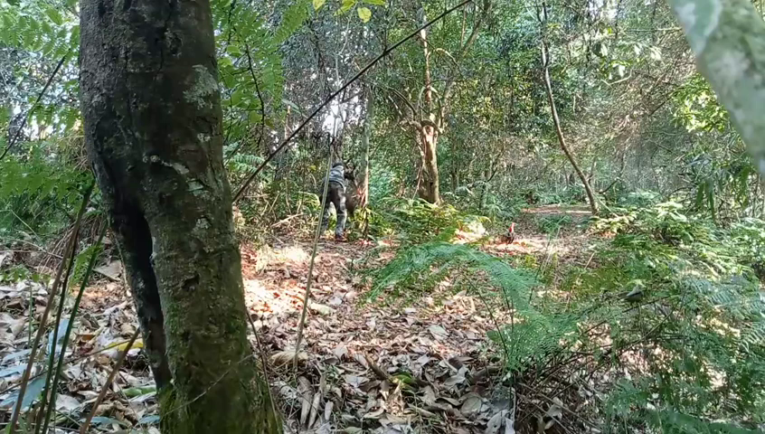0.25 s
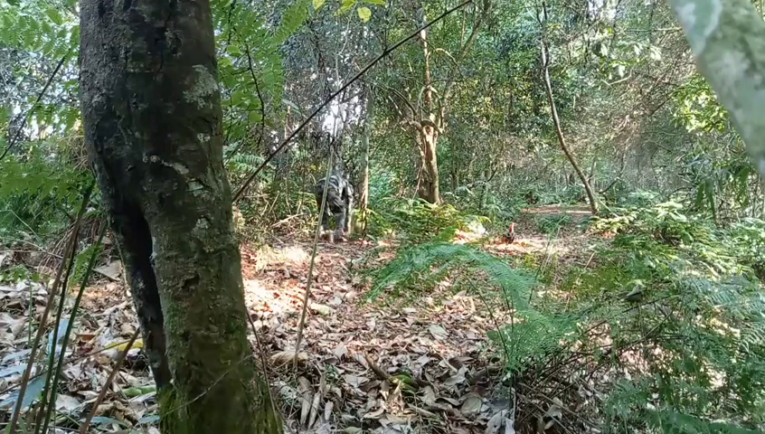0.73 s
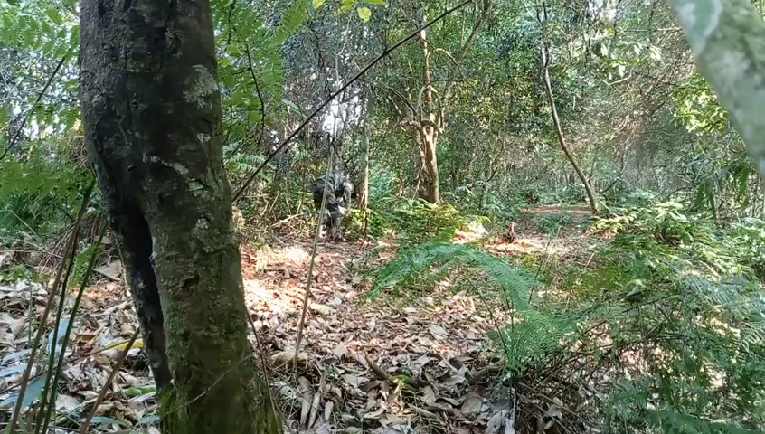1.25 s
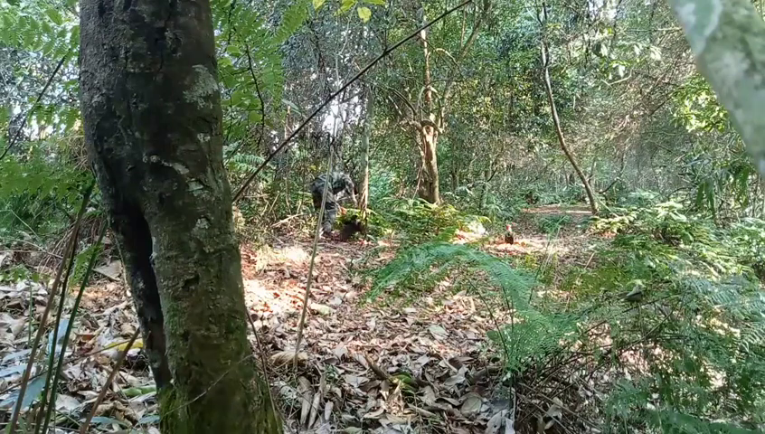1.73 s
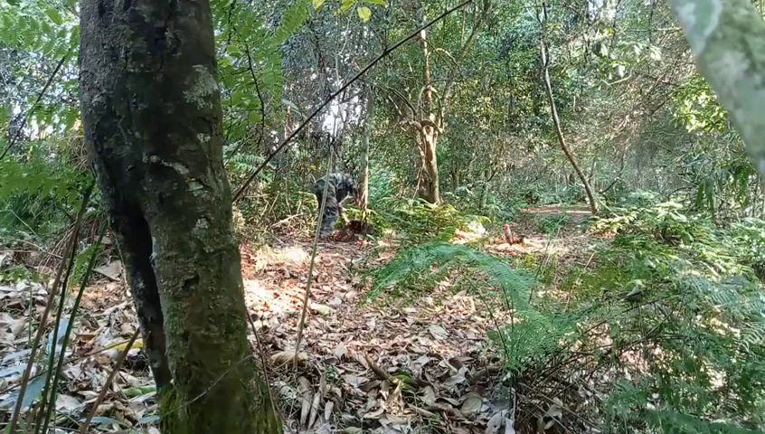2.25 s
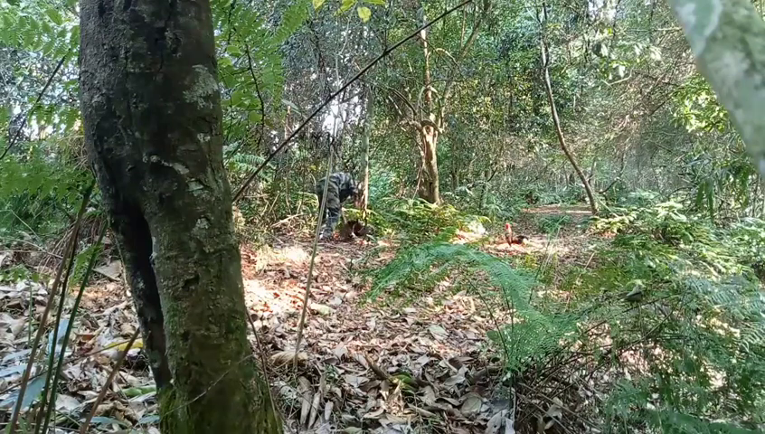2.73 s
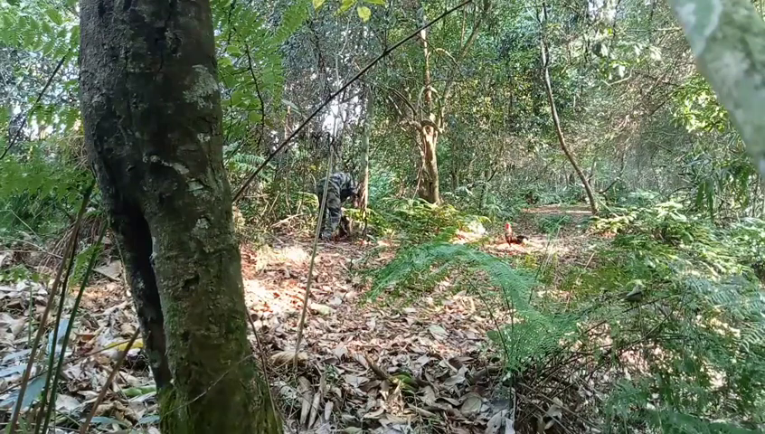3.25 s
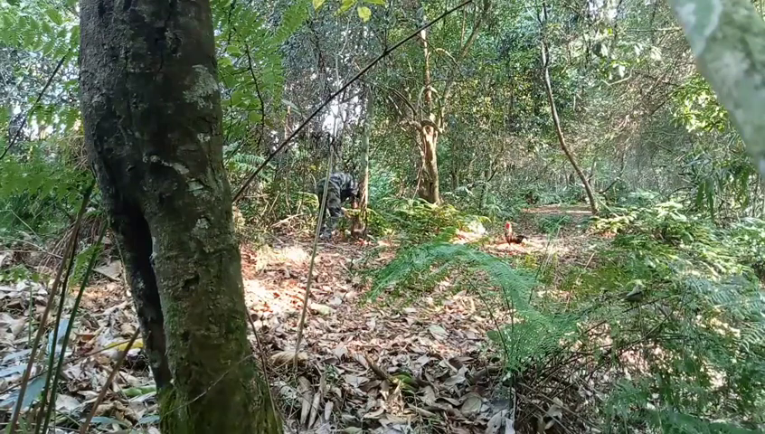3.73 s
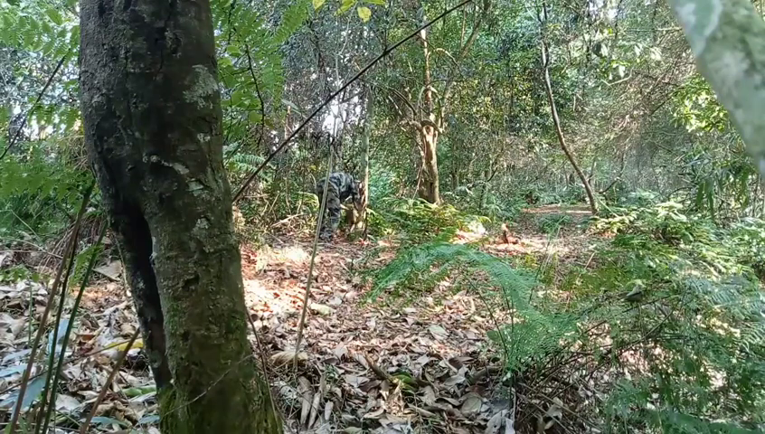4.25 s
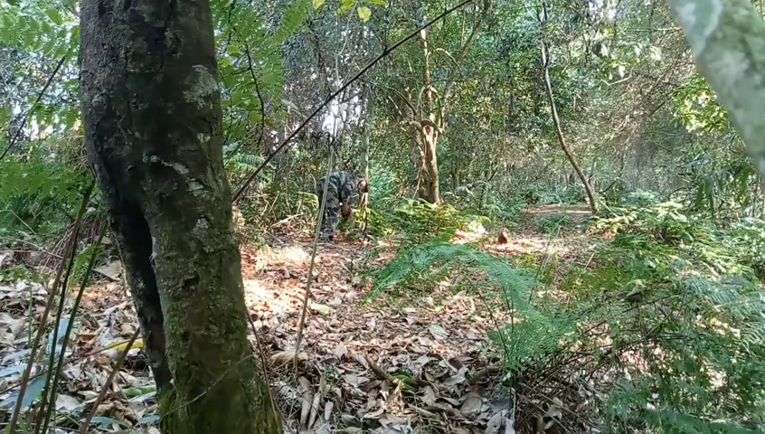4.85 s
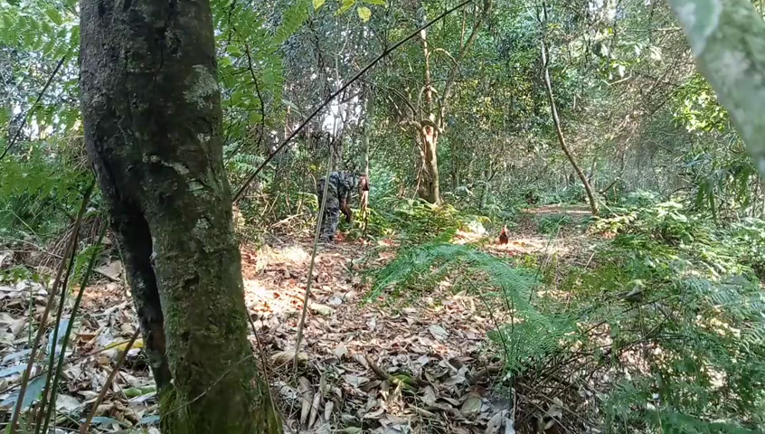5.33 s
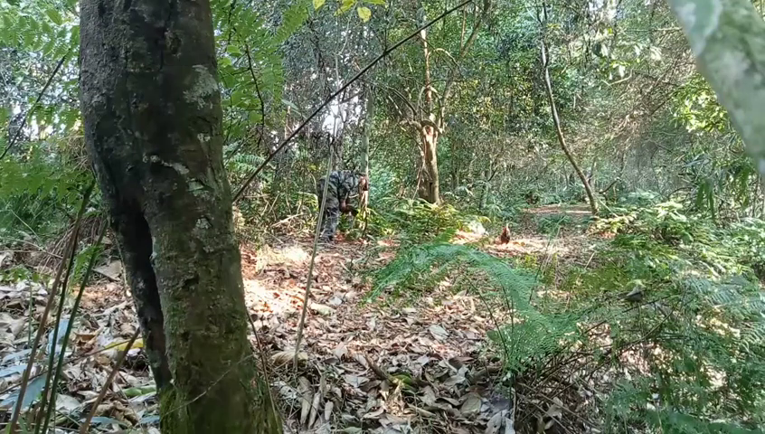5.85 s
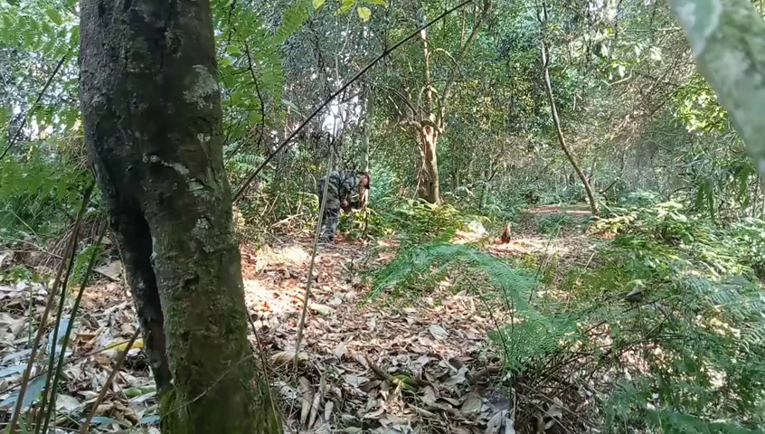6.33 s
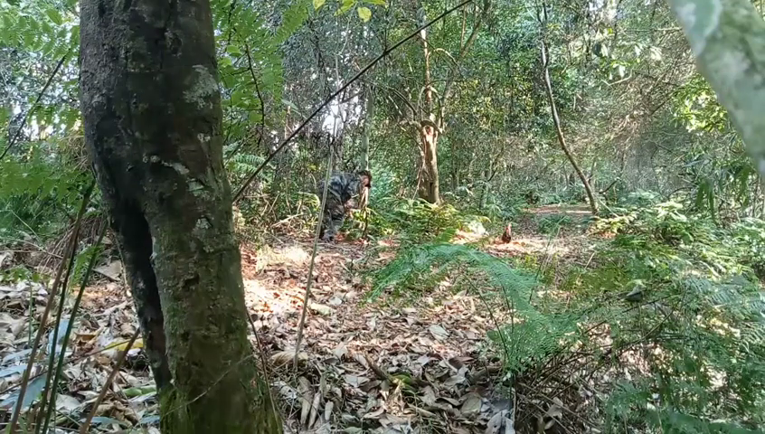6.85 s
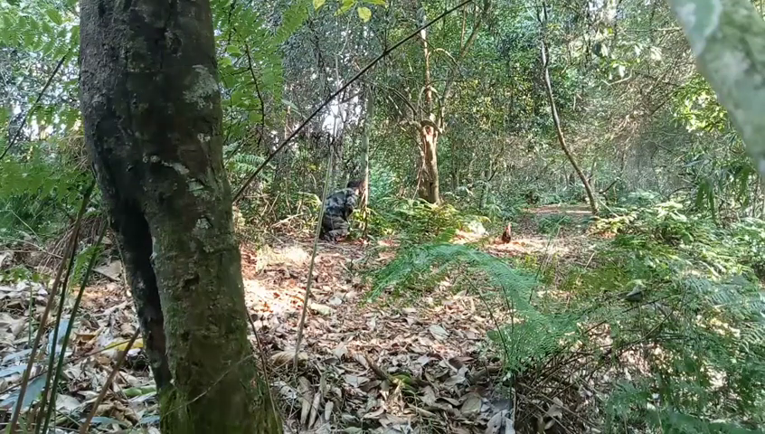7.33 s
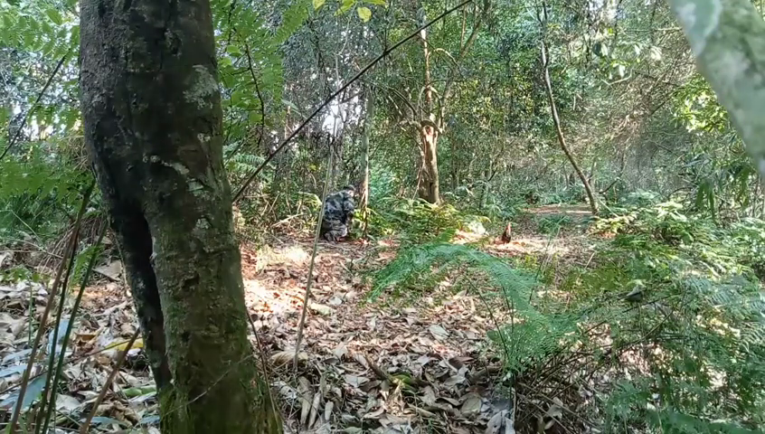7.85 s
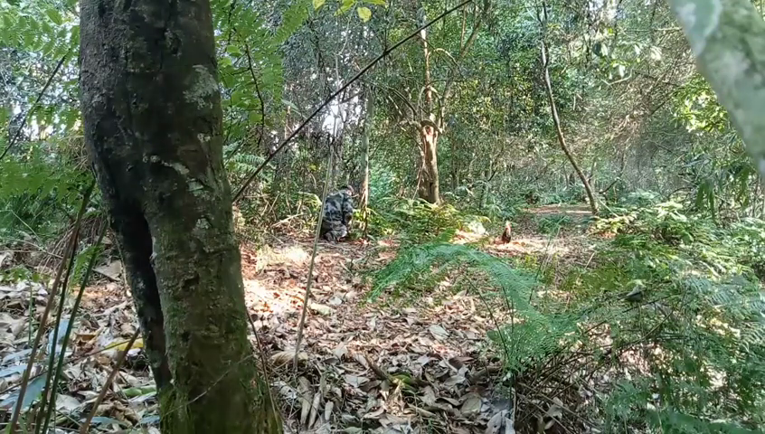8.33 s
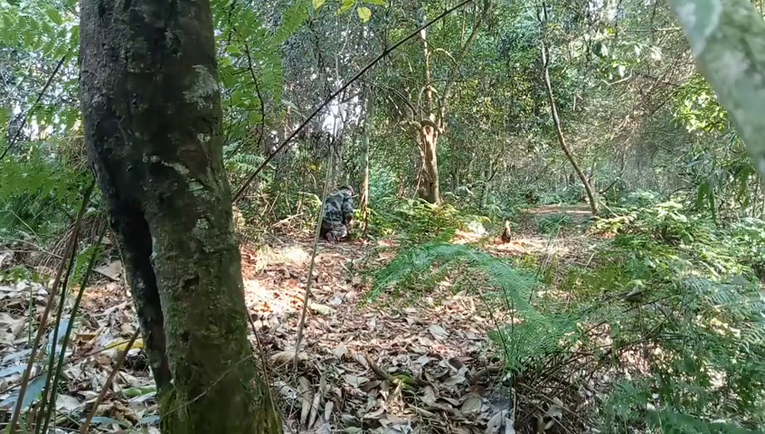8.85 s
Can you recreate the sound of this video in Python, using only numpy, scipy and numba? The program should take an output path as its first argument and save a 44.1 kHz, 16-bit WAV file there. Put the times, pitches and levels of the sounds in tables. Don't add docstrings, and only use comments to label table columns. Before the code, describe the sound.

Two chickens are heard some way off in a wood. From 0 to 1.4 s a hen gives eight short, throaty clucks, evenly spaced, while dry leaves rustle and snap under feet and a second fowl adds small high peeps and low pips. A hoarse cry grows from 1.3 s into the hen's loud, nasal squawk at 1.5 s. From 2.1 to 3.6 s the clucks are much softer, as if turned away. Leaves shuffle again around 3.7-4.2 s, clucks brighten, and a higher squawk comes at 4.4 s. Rasping cries swell at 4.9 and 5.3 s, then another squawk at 5.5 s. Clucks resume at 6.0 s beneath a long growing rasp, with a steady squawk at 7.0 s. After a lull, a faint cry and clucks from 7.8 s lead to the lowest, roughest squawk at 8.5 s and a last soft cluck near 9 s. Short diffuse echoes and faint hush surround the calls.

```python
import sys
import numpy as np
from scipy import signal
from scipy.fft import rfft, irfft
from scipy.io import wavfile
from scipy.ndimage import uniform_filter1d
from numba import njit

SR = 44100
rng = np.random.default_rng(int(sys.argv[2]) if len(sys.argv) > 2 else 0)


def wav_out(sig):
    wavfile.write(sys.argv[1], SR, np.round(np.clip(np.atleast_2d(sig).T, -1, 1) * 32767).astype(np.int16))


def how_loud(loudness_db):
    steps = np.asarray(loudness_db, float) / 20
    return 10 ** steps


N = 401310
T = np.arange(N) / SR


def level(x, db):
    return x * how_loud(db) / np.sqrt(np.mean(x ** 2) + 1e-30)


def colour(x, points, size=1024):
    hz, db = np.transpose(points)
    bins_hz = np.arange(size // 2 + 1) * SR / size
    log_gain = np.interp(np.log(bins_hz + 1), np.log(hz), db) * np.log(10) / 20
    cepstrum = irfft(log_gain)
    cepstrum[1:size // 2] *= 2
    cepstrum[size // 2 + 1:] = 0
    response = irfft(np.exp(rfft(cepstrum)))
    return signal.oaconvolve(x, response)[:len(x)]


def brighter(x, db, hz):
    treble = signal.sosfilt(signal.butter(2, hz, "high", fs=SR, output="sos"), x)
    return x + (how_loud(db) - 1) * treble


def walk(rate_hz, size):
    k = max(int(SR / rate_hz), 1)
    return level(uniform_filter1d(uniform_filter1d(rng.standard_normal(size), k), k), 0)


@njit
def sweep(x, hz, width):
    y, band, low = np.empty(len(x)), 0., 0.
    for i in range(len(x)):
        g, k = np.tan(np.pi * hz[i] / SR), width / hz[i]
        v = (band + g * (x[i] - low)) / (1 + g * (g + k))
        band, low, y[i] = 2 * v - band, low + 2 * g * v, k * v
    return y


def span(table, fade_s):
    s, *columns = np.transpose(table)
    at = slice(int(s[0] * SR), min(int(s[-1] * SR), N))
    t = T[at]
    ends = np.clip(np.minimum(t - s[0], s[-1] - t) / fade_s, 0, 1)
    return at, t, [np.interp(t, s, c) for c in columns], ends


def pulses(hz, patchy_db, overtones_db):
    phase = 2 * np.pi * np.cumsum(hz) / SR
    count = int(SR / 2.6 / np.mean(hz))
    knots = np.linspace(0, len(hz), len(hz) // 1500 + 2)
    shape_db = np.asarray(overtones_db)[np.minimum(np.arange(count), len(overtones_db) - 1), None]
    gains = how_loud(shape_db + patchy_db * rng.standard_normal((count, len(knots))))
    samples = np.arange(len(hz))
    train = sum(np.interp(samples, knots, g) * np.cos(k * phase) for k, g in enumerate(gains, 1))
    return level(train, 0), phase


def syrinx(hz, hoarse, alternate, overtones_db, wobble, chaos, chaos_hz, flicker, patchy_db):
    hoarse = np.clip(hoarse + flicker * hoarse * (1 - hoarse) * walk(30.7, len(hz)), 0, 1)
    even, phase = pulses(hz * (1 + wobble * walk(120, len(hz))), patchy_db, overtones_db)
    even = even * (1 + alternate * np.cos(phase / 2))
    uneven, phase = pulses(hz * np.exp(chaos * hoarse * walk(chaos_hz, len(hz))), patchy_db, overtones_db)
    uneven = uneven * (1 + alternate * np.cos(phase / 2)) * how_loud(2 * walk(1000, len(hz)))
    air = hoarse ** 3 * .6
    uneven = np.sqrt(1 - air) * uneven + np.sqrt(air) * rng.standard_normal(len(hz))
    return np.sqrt(1 - hoarse) * even + np.sqrt(hoarse) * uneven


LOW_HZ, HIGH_HZ = 2050, 4200


def overtones(shape_db, hz, low_db, high_db):
    at_hz = hz * np.arange(1, len(shape_db) + 1)
    return np.array(shape_db) + low_db * (at_hz < LOW_HZ) + high_db * (at_hz > HIGH_HZ)


# level/dB of overtones 1-6, then of all higher ones
FOWL_OVERTONES_DB = (-5.5, 0, 2.5, -2.5, -1.5, -0.5, -2)
# f/Hz, gain/dB
FOWL_THROAT = [(240, -59.5), (400, -23.5), (701, -32), (867, -5), (1450, -3.5), (2470, -7), (3190, -4.5),
               (5190, -8), (6500, -16.5), (9090, -16.5), (15000, -40)]


def fowl(hz, hoarse, alternate, beak_hz, low_db, high_db):
    shape_db = overtones(FOWL_OVERTONES_DB, hz[0], low_db, high_db)
    source = syrinx(hz, hoarse, alternate, shape_db, wobble=.007, chaos=.17, chaos_hz=514.4,
                    flicker=.5, patchy_db=4.0)
    throat = colour(source, FOWL_THROAT)
    return level(throat + 1.73 * sweep(throat, beak_hz, 670.0), 0)


# t/s, length/s, start f/Hz, end f/Hz, peak level/dB
PEEPS = [
    (0.0, 0.069, 1800, 1680, -43.5),
    (0.523, 0.029, 1800, 1800, -31),
    (.55, 0.073, 1830, 1750, -42),
    (1.046, 0.15, 830, 800, -54.5),
    (1.174, .04, 830, 800, -38.5),
    (1.21, 0.11, 870, 890, -39),
    (3.991, 0.12, 775, 810, -46.5),
    (4.772, 0.072, 1514, 2430, -41),
    (6.252, 0.077, 1460, 1700, -67.5),
]
# loss by the end/dB, beak f/Hz, overtones below LOW_HZ/dB, overtones above HIGH_HZ/dB
PEEP_SHAPES = [(13, 2400, -1, -4), (12, 1700, -5, -6.5), (7, 3700, 8, -3.5), (-1, 1100, -16.5, -14.5),
               (2.5, 3300, -16.5, 3.5), (5, 2650, -15, 5.5), (-1, 2600, -23.5, 2), (6.5, 3200, -10.5, -6.5),
               (-3, 1440, 10, -15)]
PEEP_ATTACK_S, PEEP_FADE_SHARE, PEEP_HOARSE = .008, .4, .38


def peeps():
    out = np.zeros(N)
    for peep, shape in zip(PEEPS, PEEP_SHAPES):
        s, length, from_hz, to_hz, db = peep
        lost_db, beak_hz, low_db, high_db = shape
        times = s + np.array([0, PEEP_ATTACK_S, PEEP_FADE_SHARE * length, length])
        pitch = [from_hz, from_hz, .3 * to_hz + .7 * from_hz, to_hz]
        gains_db = db - np.array([9, 0, 0.93 * lost_db, lost_db])
        at, t, (hz, gain_db), ends = span(np.transpose([times, pitch, gains_db]), fade_s=0.0017)
        voice = fowl(hz, PEEP_HOARSE + 0 * t, 0, beak_hz + 0 * t, low_db, high_db)
        out[at] += voice * how_loud(gain_db) * ends
    return out


# t/s, drag/s, rustle level/dB, ground thud re rustle/dB
STEPS = [(0.034, 0.018, -56, 3), (.15, 0.094, -58, 3.5), (.3, 0.014, -68.5, 9), (.43, .06, -62.5, -11.5),
         (.53, .02, -57, -15.5), (0.575, .02, -58, 15), (0.631, .08, -62.5, 2), (0.831, .03, -54, 5),
         (.9, .26, -64, 6.5), (1.2, .02, -59, -23), (3.712, .02, -60, 6), (3.826, .02, -61, 7),
         (3.93, .16, -56.5, 1), (4.13, .05, -47.5, -4.5)]
# t/s, peak level/dB
SNAPS = [(0.0333, -44), (0.19, -46.5), (0.574, -55), (0.722, -57), (0.9782, -48), (3.706, -53.5),
         (3.8145, -48), (4.0043, -50.5), (8.3018, -58), (8.315, -61), (8.345, -50), (8.3506, -61)]
# f/Hz, density/dB per Hz
LEAF = [(150, -31.5), (250, -11.5), (420, -11), (499, -9.5), (755, -8), (995, -9), (1610, -8), (6420, -11),
        (9390, -9), (15500, -24)]
STEP_ATTACK_S, STEP_RELEASE_S, STEP_DRAG_DB, STEP_EDGE_DB = .035, 0.074, -3.5, -14.5
THUD_ATTACK_S, THUD_DECAY_S = .006, 0.018


def feet():
    out = np.zeros(N)
    thud_band = signal.butter(3, (85, 480), "band", fs=SR, output="sos")
    for s, drag, top_db, thud_db in STEPS:
        times = np.maximum(s + np.cumsum([-STEP_ATTACK_S, STEP_ATTACK_S, drag, STEP_RELEASE_S]), 0)
        gains_db = top_db + np.array([STEP_EDGE_DB, 0, STEP_DRAG_DB, STEP_EDGE_DB])
        at, t, (db,), ends = span(np.transpose([times, gains_db]), fade_s=0.0029)
        grains = rng.standard_normal(len(t)) * how_loud(0.78 * rng.exponential(size=len(t)))
        grains = grains * how_loud(5.5 * walk(60, len(t)))
        rustle = level(colour(grains, LEAF), 7.7)
        landing = np.exp(np.minimum((t - s) / THUD_ATTACK_S, (s - t) / THUD_DECAY_S))
        thud = level(signal.sosfilt(thud_band, rng.standard_normal(len(t))), 0)
        out[at] += how_loud(db) * ends * (rustle + thud * how_loud(thud_db + 3.5) * landing)
    t = np.arange(int(.012 * SR)) / SR
    for s, db in SNAPS:
        crack = rng.standard_normal(len(t)) * np.exp(-t / 0.00038)
        crack = sweep(crack, 9000 + 0 * t, 7000.)
        i = int(s * SR)
        out[i:i + len(t)] += crack * how_loud(db + 13.5) / np.abs(crack).max()
    return out


# t/s, peak level/dB, treble/dB
CLUCKS = [(0.089, -36, 9), (0.271, -37, 8), (0.442, -40, 8.5), (0.639, -40, 8.5), (0.812, -38, 5.5),
          (1.002, -37, 7), (1.183, -38.5, 11.5), (1.373, -36.5, 8), (3.74, -46, -11.5), (3.918, -44, 2.5),
          (4.118, -32, 12), (4.3, -30.5, 12), (5.065, -37.5, 17), (5.243, -38, -12.5), (5.43, -31.5, -12.5),
          (6.02, -39, 8.5), (6.375, -39.5, 4), (6.537, -35.5, 8), (6.724, -34.5, 11.5), (6.905, -34, 14.5),
          (8.025, -38.5, 6), (8.223, -37, 5.5), (8.393, -33.5, 5.5), (8.957, -42.5, 5.5)]
# t/s, peak level/dB
CLUCKS_AWAY = [(2.147, -48.5), (2.355, -51), (2.54, -46.5), (2.711, -44.5), (2.888, -49), (3.063, -46.5),
               (3.23, -51.5), (3.402, -49.5), (3.582, -49.5)]
CLUCK_TREBLE_AWAY_DB = 4.5
# f/Hz, width/Hz, gain/dB
CLUCK_THROAT = [(262, 61, -20), (677, 340, -14.5), (959, 398, 2), (2760, 220, -12.5), (3540, 230, -13.5),
                (4375, 260, -17.5), (5940, 340, -28), (8800, 1400, -30.5), (11760, 7600, -43.5)]


def clucks():
    out, t = np.zeros(N), np.arange(int(.056 * SR)) / SR
    swell = np.minimum(1.06 * np.sin(np.pi * t / t[-1]) ** 1.01, 1)
    away = [(*row, CLUCK_TREBLE_AWAY_DB) for row in CLUCKS_AWAY]
    for s, db, treble_db in list(CLUCKS) + away:
        hz = 280 * (1 + .05 * rng.standard_normal()) * (1 - 0.11 * t / t[-1])
        source = syrinx(hz, hoarse=0.36, alternate=.1, overtones_db=[0], wobble=.04, chaos=0.33,
                        chaos_hz=292.0, flicker=.3, patchy_db=0.5)
        source = source + .4 * rng.standard_normal(len(t))
        throat = np.zeros(len(t))
        for f, width, gain_db in CLUCK_THROAT:
            once = sweep(source, f + 0 * t, width + 0.)
            throat += how_loud(gain_db) * sweep(once, f + 0 * t, width + 0.)
        i = int((s - .009) * SR)
        out[i:i + len(t)] += brighter(level(throat, db - 4.5) * swell, treble_db, hz=1860)
    return out


# t/s, length/s, swell/s, level after the swell/dB, end level/dB
CRIES = [
    (1.269, .235, .1, -32.5, -23),
    (4.059, 0.29, .06, -35, -40),
    (4.88, 0.43, .18, -28.5, -28),
    (5.328, .22, .01, -24, -31.5),
    (6.28, .66, 0.16, -43.5, -33),
    (6.941, .175, .03, -27, -27),
    (7.766, .72, 0.25, -49.5, -45.5),
]
# rasp f/Hz, open beak f/Hz, closing beak f/Hz, overtones below LOW_HZ/dB, above HIGH_HZ/dB
CRY_SHAPES = [(930, 2800, 1910, 2, 5), (830, 2600, 1500, -2.5, 5), (930, 2900, 2400, -4.5, -11),
              (850, 2100, 2120, 2, -7), (850, 2660, 630, 1, -9.5), (930, 2620, 2400, 3, -2.5),
              (830, 3060, 2200, 5.5, -4.5)]
# t/s, length/s, start f/Hz, end f/Hz, level/dB
CLEAN_LOCKS = [(5.199, 0.046, 954, 970, -26.5), (5.26, .062, 979, 925, -21.5),
               (5.465, .06, 930, 915, -25.5), (6.594, .022, 918.4, 1010, -36.5),
               (6.953, 0.14, 882, 878, -32.5)]
HALF_LOCKS = [(1.291, .05, 955, 933, -39.5), (1.355, .08, 895, 873, -35.5), (1.45, 0.056, 878, 909, -29),
              (4.115, .09, 850, 855, -32.5), (4.217, .055, 882, 905, -31.5),
              (5.055, .045, 953.4, 986.5, -32.5), (5.136, 0.026, 932.5, 923, -26),
              (7.09, 0.016, 907, 1083, -31), (8.246, .05, 880, 864, -55.5), (8.31, .11, 871, 804, -52)]
FAINT_LOCKS = [(4.281, 0.046, 884, 696, -35), (5.014, .03, 946, 938, -32), (5.164, .025, 930, 964, -26),
               (5.345, .09, 794.6, 830, -32.5), (6.74, .11, 804, 758.6, -40), (6.87, .06, 773, 810, -37.5),
               (8.431, 0.023, 850, 970, -47)]
SWELL_DB_PER_S, RASP_WANDER, LOCK_S = 131.5, .05, .011
RASP_HOARSE, FAINT_HOARSE, HALF_HOARSE, HALF_ALTERNATE, CLEAN_HOARSE = .92, .68, .3, .1, .08


def cries():
    out = np.zeros(N)
    locks = [(*row, CLEAN_HOARSE, 0) for row in CLEAN_LOCKS]
    locks += [(*row, HALF_HOARSE, HALF_ALTERNATE) for row in HALF_LOCKS]
    locks += [(*row, FAINT_HOARSE, HALF_ALTERNATE) for row in FAINT_LOCKS]
    for cry, cry_shape in zip(CRIES, CRY_SHAPES):
        s, length, swell, top_db, end_db = cry
        rasp_hz, open_hz, shut_hz, low_db, high_db = cry_shape
        envelope = [(s, top_db - SWELL_DB_PER_S * swell), (s + swell, top_db), (s + length, end_db)]
        at, t, (db,), ends = span(envelope, fade_s=0.0098)
        voice = np.array([rasp_hz * (1 + RASP_WANDER * walk(12, len(t))), db, RASP_HOARSE + 0 * t, 0 * t])
        for when, held, from_hz, to_hz, lock_db, hoarse, alternate in locks:
            locked = np.clip(np.minimum(t - when, when + held - t) / LOCK_S + 1, 0, 1)
            lock_hz = np.interp(t, [when, when + held], [from_hz, to_hz])
            steady = np.array([lock_hz, lock_db + 0 * t, hoarse + 0 * t, alternate + 0 * t])
            voice = voice + locked * (steady - voice)
        hz, db, hoarse, alternate = voice
        beak_hz = open_hz + (shut_hz - open_hz) * np.abs((t - s) / length) ** 2.7
        out[at] += fowl(hz, hoarse, alternate, beak_hz, low_db, high_db) * how_loud(db) * ends
    return out


# t/s, time until the voice drops/s, f/Hz reached by the attack, settled f/Hz, f/Hz before the drop
SQUAWKS = [
    (1.488, .205, 755.5, 708, 732),
    (4.405, 0.16, 786, 808, 790),
    (5.541, 0.24, 794.7, 770, 763),
    (7.014, .24, 754, 747, 757),
    (8.515, 0.23, 663.6, 660, 710),
]
# attack/s, level after it/dB, loss while held/dB, overtones below LOW_HZ/dB, above HIGH_HZ/dB
SQUAWK_EFFORT = [(.035, -23.5, 7, 0.5, 5), (.04, -26, 3.5, 0, 0.5), (.03, -25, 2.5, 2.5, -1),
                 (0.041, -24.5, 4, -0.5, -0.5), (.018, -27, 4, 2, -1)]
SQUAWK_TREBLE_DB = (-1.5, -8.5, -3.5, 0.5, -2.5, -5)
SQUAWK_HOARSE = (.65, .05, .04, .04, .6, .8)
# t/s, hoarse share before, after, alternation before, after
BREAKS = [
    (1.6, .14, .28, .05, .9),
    (5.73, .04, .12, 0, .2),
    (8.6, .3, .55, .2, .8),
]
# level/dB of overtones 1-6, then of all higher ones
HEN_OVERTONES_DB = (2.5, -1.5, 0.5, 1.3, 4.5, 5.5, -1.5)
# f/Hz, gain/dB
SQUAWK_THROAT = [(290, -55), (500, -23), (745, -23.5), (1210, -3.5), (1470, -6), (1850, -11), (2290, -2.5),
                 (3370, -18.5), (4050, -15.5), (6300, -34.5), (9510, -22), (13800, -41), (15000, -40.5)]
SQUAWK_START_PITCH, SQUAWK_DROP_PITCH = .88, .91
SQUAWK_START_DB, SQUAWK_KICK_DB, SQUAWK_END_DB = -2, 1.5, -10
SQUAWK_SETTLE_S, SQUAWK_DROP_S, SQUAWK_END_S = .06, .02, .018
BREAK_S = 0.049


def squawks():
    out = np.zeros(N)
    for squawk, effort in zip(SQUAWKS, SQUAWK_EFFORT):
        s, hold, top_hz, settled_hz, last_hz = squawk
        attack, top_db, sag_db, low_db, high_db = effort
        held = hold - attack - SQUAWK_SETTLE_S
        times = s + np.cumsum([0, attack, SQUAWK_SETTLE_S, held, SQUAWK_DROP_S, SQUAWK_END_S])
        pitch = [SQUAWK_START_PITCH * top_hz, top_hz, settled_hz, last_hz] + [SQUAWK_DROP_PITCH * last_hz] * 2
        gain = top_db + np.array([SQUAWK_START_DB, 0, -sag_db / 2, -sag_db,
                                  SQUAWK_KICK_DB - sag_db, SQUAWK_END_DB - sag_db])
        table = np.transpose([times, pitch, gain, SQUAWK_TREBLE_DB, SQUAWK_HOARSE])
        at, t, (hz, db, treble_db, hoarse), ends = span(table, fade_s=0.012)
        alternate = 0 * t
        for when, before, after, few, pairs in BREAKS:
            if s < when < s + hold:
                broken = np.clip((t - when) / BREAK_S + .5, 0, 1)
                hoarse = np.maximum(hoarse, before + (after - before) * broken)
                alternate = few + (pairs - few) * broken
        shape_db = overtones(HEN_OVERTONES_DB, settled_hz, low_db, high_db)
        source = syrinx(hz, hoarse, alternate, shape_db, wobble=0.0046, chaos=.14, chaos_hz=445,
                        flicker=.7, patchy_db=3.5)
        throat = level(colour(source, SQUAWK_THROAT), 0)
        out[at] += brighter(throat, treble_db, hz=5540) * how_loud(db) * ends
    return out


def foliage(x, smear_s):
    t = np.arange(2048) / SR
    paths = rfft(rng.standard_normal(len(t)) * np.exp(-t / smear_s))
    scatter = np.roll(irfft(paths / np.abs(paths)), 128)
    return signal.oaconvolve(x, scatter)[128:N + 128]


# f/Hz, gain/dB
ECHO_COLOUR = [(100, -17), (700, -4), (2000, -3.5), (5000, -1), (15000, -2)]


def trunks(x, t60, echo_db):
    t = np.arange(int(.75 * SR)) / SR
    decay = np.exp(-np.log(1000) * t / t60)
    onset = np.clip((t - .004) / 0.0056, 0, 1)
    tail = colour(rng.standard_normal(len(t)) * decay * onset, ECHO_COLOUR)
    return how_loud(echo_db) * signal.oaconvolve(x, tail / np.sqrt(np.sum(tail ** 2)))[:N]


# f/Hz, gain/dB
HUSH = [(18, -31.5), (30, -14), (114, 2.5), (379, 0.5), (622, 2), (830, 2.5), (5040, -13), (6370, -12),
        (8720, -16.5), (15500, -22.5)]
HUSH_DB = -75.5


def hush(sounds):
    heard_db = 10 * np.log10(uniform_filter1d(sounds ** 2, int(0.021 * SR)) + 1e-12)
    opening = np.clip((heard_db + 81.0) / 35, 0, 1)
    steady = level(colour(rng.standard_normal(N), HUSH), HUSH_DB - 4.5)
    return steady * how_loud(16.5 * opening + 2 * walk(29, N))


def scene():
    birds = foliage(peeps() + clucks() + cries() + squawks(), smear_s=0.0017)
    steps = feet()
    near = trunks(birds + 1.2 * steps, t60=0.31, echo_db=-5.5)
    far = trunks(brighter(birds, -14.0, hz=2200), t60=0.63, echo_db=-20.5)
    sounds = birds + steps + near + far
    return (sounds + hush(sounds))[None]


def low_pass(x):
    return signal.sosfilt(signal.butter(12, 15760, fs=SR, output="sos"), x)


def record(dry):
    return low_pass(dry)


dry = scene()
out = record(dry)
wav_out(out)
```